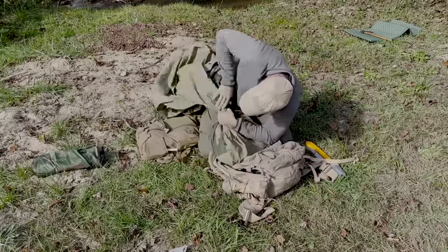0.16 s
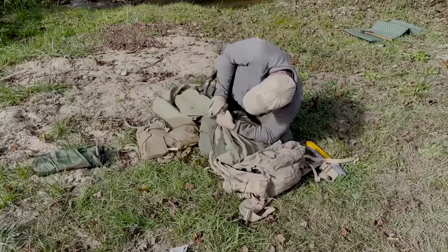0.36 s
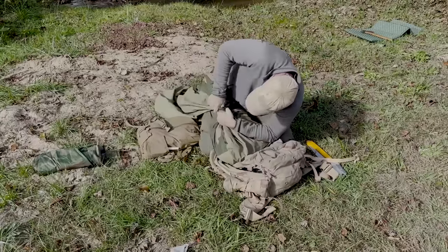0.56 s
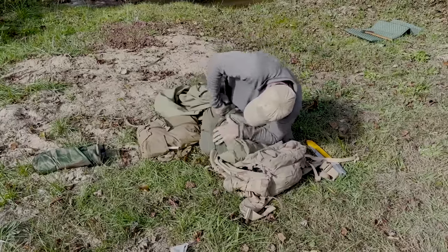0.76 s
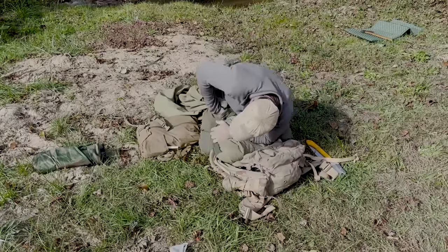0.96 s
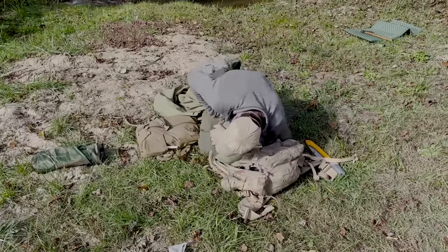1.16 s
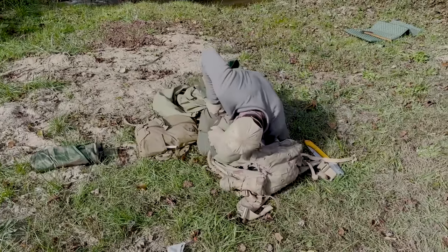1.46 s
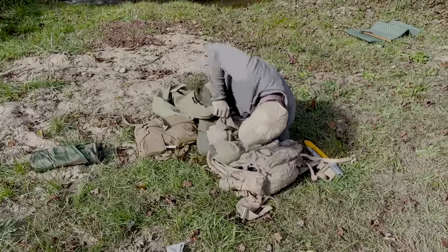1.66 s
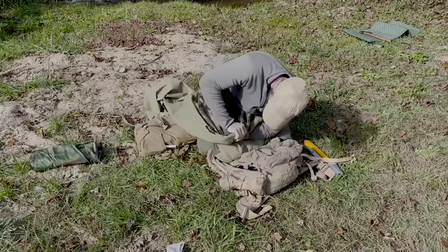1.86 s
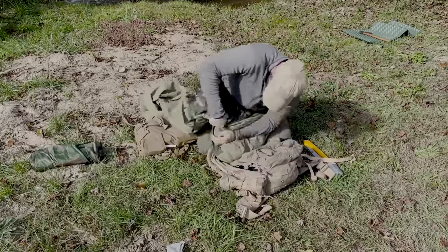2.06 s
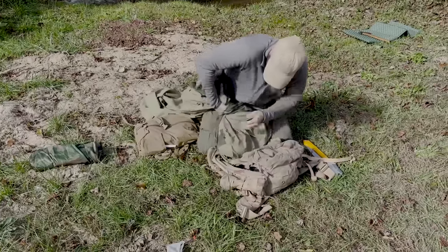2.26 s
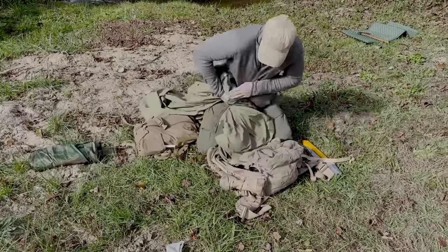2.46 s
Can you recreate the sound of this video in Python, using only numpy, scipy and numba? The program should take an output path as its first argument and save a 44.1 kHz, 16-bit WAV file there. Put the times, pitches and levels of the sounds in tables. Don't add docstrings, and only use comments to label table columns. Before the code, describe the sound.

Stiff coated fabric rustles as a stuffed bag is twisted shut on open ground, a few metres away. Swishes come at 0.1-0.3 seconds, brightest and sharpest near 0.6, with small crease ticks around 1.1-1.5, longer soft slides from 1.6 to 2.3, and a last rustle near 2.5. Low wind flutters buffet the microphone at 0.1-0.4 and 0.7-0.85, fading to faint puffs over distant outdoor hush.

```python
import sys
import numpy as np
from scipy import signal
from scipy.fft import rfft, irfft
from scipy.io import wavfile
from scipy.ndimage import uniform_filter1d
from numba import njit

SR = 44100
rng = np.random.default_rng(int(sys.argv[2]) if len(sys.argv) > 2 else 0)


def nominal_scale(level):
    x = np.asarray(level, float) / 20
    return 10 ** x


def transcribe(signal):
    frames = np.atleast_2d(signal).T
    limited = np.clip(frames, -1, 1)
    pcm = np.round(limited * 32767).astype(np.int16)
    wavfile.write(sys.argv[1], SR, pcm)


N = 114660


def unit(x):
    return x / np.sqrt(np.mean(x ** 2))


@njit
def svf(x, hz, damping, low):
    y, band, deep = np.empty(len(x)), 0., 0.
    for i in range(len(x)):
        g = np.tan(np.pi * hz[i] / SR)
        v = (band + g * (x[i] - deep)) / (1 + g * (g + damping))
        y[i] = low * (deep + g * v) + (1 - low) * damping * v
        band, deep = 2 * v - band, deep + 2 * g * v
    return y


def walk(rate_hz):
    hold = int(SR / rate_hz)
    steps = np.repeat(rng.standard_normal(N)[:N // hold + 1], hold)
    return 1.2 * uniform_filter1d(uniform_filter1d(steps, hold), hold)[:N]


def colour(x, table, tilt_db=0.):
    octave = np.log2(np.fft.rfftfreq(x.shape[-1], 1 / SR) + 1)
    hz, db = np.transpose(table)
    curve_db = np.interp(octave, np.log2(hz), db) + tilt_db * (octave - np.log2(3000))
    return irfft(rfft(x) * nominal_scale(curve_db), x.shape[-1])


def swell(count, rise):
    u, rise = np.arange(count) / count, np.clip(rise, .05, .9)
    return np.sin(np.pi / 2 * np.minimum(u / rise, (1 - u) / (1 - rise))) ** 2


def add(out, x, start_s):
    i = int(start_s * SR)
    out[..., i:i + x.shape[-1]] += x[..., :N - i]


def hush():
    # frequency in Hz, level in dB per Hz.
    hush_tone = [(70, -16), (200, -11.5), (670, -3.5), (810, 0.5), (980, -5), (2800, -7.5), (11000, -7.5),
                 (13500, -61)]
    base = rfft(unit(colour(rng.standard_normal((2, N)), hush_tone)))
    octaves = np.log2(np.fft.rfftfreq(N, 1 / SR) + 1)
    out, together = 0, walk(1.0)
    for octave in np.arange(4, 15):
        band = irfft(base * np.clip(1 - abs(octaves - octave), 0, 1), N)
        out = out + band * nominal_scale(.5 * together + .8 * walk(9.33))
    return out * nominal_scale(-54.5)


def rumble():
    # time in seconds, rumble level in dB.
    gust = [(0, -32), (0.092, -25), (0.105, -39.5), (.16, -22), (.21, -20), (.35, -23.5), (.4, -32),
            (.52, -38), (.64, -37.5), (0.699, -28.5), (0.728, -19.5), (0.821, -15.5), (.865, -34),
            (.9, -45), (1.03, -57.5), (1.5, -60), (1.7, -75), (2.6, -81)]
    times, levels = np.transpose(gust)
    flutter_db = 2.2 * walk(45)
    db = np.interp(np.arange(N) / SR, times, levels) + flutter_db
    top_hz = np.clip(230 * 2 ** ((db + 21) / 23.5), 40, 3000)
    gain = nominal_scale(db) * np.sqrt(SR / 2 / top_hz)

    def lead(x):
        return np.r_[x[2000:0:-1], x]

    out, top_hz = np.zeros((2, N)), lead(top_hz)
    for ch, noise in enumerate(rng.standard_normal((2, N))):
        push = svf(lead(noise * gain), top_hz, 1.48, 0.88)
        push = svf(push, top_hz, 1.46, 0.88)
        out[ch] = svf(push, 1.88 * top_hz, 1.41, 1.)[-N:]
    return out


def eddies():
    # start in seconds, length in seconds, level in dB, centre in Hz.
    eddy_rows = [(.046, 0.013, -30, 515), (.061, 0.024, -37.5, 580), (.106, 0.041, -38, 335),
                 (.135, 0.018, -31, 634), (.172, 0.014, -27, 646), (0.184, 0.03, -24.5, 683),
                 (.2, 0.027, -25.5, 680), (0.215, 0.051, -29, 344), (0.24, 0.023, -25, 227),
                 (.268, 0.041, -14.5, 238), (.29, 0.031, -24, 338), (.315, 0.054, -23.5, 251),
                 (.345, 0.048, -33.5, 240), (.365, 0.031, -35, 230), (0.437, 0.0051, -40.5, 740),
                 (.45, 0.08, -40, 120), (.53, 0.13, -40, 111), (0.652, 0.014, -33, 230),
                 (0.69, 0.036, -28.5, 239.6), (0.726, 0.029, -27, 278), (.772, 0.057, -26, 230),
                 (0.797, 0.018, -25.5, 242), (.81, 0.02, -24, 241), (.828, 0.016, -25, 192),
                 (.15, 0.042, -34, 614), (.273, 0.0055, -39, 890), (.712, 0.017, -30, 336),
                 (.68, .09, -31, 98), (1.345, 0.012, -58, 258)]
    # start in seconds, length in seconds, level in dB, centre in
    # Hz.
    more_eddies = [(.398, 0.048, -43.5, 330), (0.72, 0.016, -35, 274), (.465, 0.034, -45.5, 290),
                   (.533, 0.015, -50, 300), (.555, 0.015, -52, 490), (.59, 0.014, -52, 210), (.42, .1, -40, 123),
                   (.57, .08, -42, 85), (.99, .012, -58, 510), (0, .015, -63, 700), (1.53, 0.023, -64, 280),
                   (1.4, 0.033, -58, 190), (.194, 0.011, -28, 890), (0.014, 0.033, -47.5, 330),
                   (0.47, 0.024, -52, 800), (.798, .017, -28.5, 472), (.811, 0.017, -26.5, 474),
                   (.692, 0.027, -34, 410), (0.76, .07, -61.5, 66), (1.8, 0.051, -72, 66), (1.9, 0.081, -59, 66),
                   (.75, .02, -38, 370), (1.38, 0.051, -53, 73), (.63, .05, -40.5, 140)]
    # time in seconds, level in dB.
    puffs = [(0.916, -45.5), (0.952, -49), (0.985, -42), (1.062, -56.5), (1.108, -75), (1.202, -55.5),
             (1.254, -44), (1.291, -54), (1.343, -45.5), (1.389, -64), (1.44, -63), (1.474, -60),
             (1.529, -75), (1.632, -68), (1.94, -62), (2.33, -63), (2.45, -55), (2.475, -56.5),
             (2.561, -64)]
    soft = [(s - 0.0084, 0.032, db, 93.5) for s, db in puffs]
    bursts = list(eddy_rows) + soft + list(more_eddies)
    out = np.zeros((2, N))
    for (s, length_s, db, hz), seed in zip(bursts, rng.standard_normal((len(bursts), 2, 4096))):
        n = min(int(length_s * SR), 3000)
        push = seed * np.pad(swell(n, 0.14), (0, 4096 - n))
        sag_hz = hz * 0.83 ** np.minimum(np.arange(4096) / n - .4, 1.)
        burst = []
        for p in push:
            p = svf(p, sag_hz, 0.98, 0.)
            p = svf(p, 1.63 * sag_hz, 0.94, 0.85)
            burst.append(svf(p, 1.073 * sag_hz, 1.45, 1.0))
        burst = np.array(burst)
        rms = np.sqrt(np.sum(burst ** 2, axis=1, keepdims=True) / (n / 2))
        add(out, nominal_scale(db) * burst / rms, s)
    return out


def wind():
    likeness, lead_s, left_db = 0.89, 0.0001, 1.0
    mid, side = (rumble() + eddies()) * np.sqrt(np.array([[1 + likeness], [1 - likeness]]) / 2)
    t = np.arange(N) / SR
    right = np.interp(t + lead_s, t, mid - side)
    return np.array([(mid + side) * nominal_scale(left_db / 2), right * nominal_scale(-left_db / 2)])


def ticks():
    # start in seconds, level in dB, ring in Hz.
    snap_list = [(.105, -51, 6000), (0.946, -50, 1690), (1.103, -45, 9400), (1.110, -53, 8300),
                 (1.136, -48, 8000), (1.142, -52, 4200), (1.152, -54, 7700), (1.202, -54, 7300),
                 (1.28, -51, 7140), (1.313, -53, 7900), (1.325, -51, 8000), (1.47, -51, 8220),
                 (1.517, -51, 8500), (1.524, -50, 4700), (1.975, -48, 2350), (2.4, -50, 3020),
                 (1.08, -53, 4600), (.9, -53, 6000), (.907, -53, 7000)]
    out, n = np.zeros((2, N)), int(.005 * SR)
    for (s, db, hz), seed in zip(snap_list, rng.standard_normal((len(snap_list), 512))):
        ring = svf(seed[:n], np.full(n, 1. * hz), .3, 0.)
        add(out[0], nominal_scale(db) * unit(ring) * swell(n, 0.12), s)
    return out


def fabric():
    # start in seconds, length in seconds, level in dB, brightness in dB per octave.
    strokes = [(0.049, 0.11, -50, -2), (0.096, 0.2, -48, -1.9), (0.34, 0.046, -57.5, 1),
               (0.5697, 0.074, -43.5, 4.5), (0.67, 0.063, -49.5, 3), (0.546, 0.16, -56, 3),
               (0.745, 0.051, -52.5, -2.5), (0.73, 0.16, -55, -3.5), (0.87, 0.19, -56, -2.3),
               (2.147, 0.23, -58, -4), (1.467, 0.2, -58, 0), (1.575, 0.42, -55.5, 0), (1.9, 0.31, -49.5, 1),
               (.125, 0.11, -60, 4), (0.66, 0.045, -58, 3), (1.7, 0.083, -57, 3), (0.233, 0.13, -56.5, -2),
               (1.99, 0.096, -59, 0.5), (2.09, .17, -54.5, 0.7), (0.24, 0.46, -57.5, -2),
               (.62, 0.43, -60, 3.5), (1.255, 0.34, -65, -1), (2.32, 0.5, -63, -0.5),
               (1.59, 0.28, -70, 0.5), (2.042, 0.3, -53.5, 2.4), (1.806, 0.4, -65.5, -1.5),
               (1.5, 0.13, -78, -5), (1.577, 0.2, -61.5, -0.1), (1.957, 0.19, -63.5, -4.5),
               (2.3, 0.19, -59, -2.5), (2.431, 0.098, -52, -0.5), (2.514, 0.13, -53, -3)]
    # frequency in Hz, level in dB per Hz.
    cloth_tone = [(150, -5), (400, -2.5), (800, -4.5), (2000, -5), (6000, -6), (9000, -5), (11300, -1),
                  (15500, -14.5)]
    creases_per_s, crease_db, crease_share = 9300, 4, 0.57
    out, chance = np.zeros((2, N)), rng.random((2, N))
    size = (chance[0] < creases_per_s / SR) * nominal_scale(-crease_db * np.log(chance[1] + 0.0045))
    creases = unit(signal.lfilter([1], [1, -.9], size) * rng.standard_normal((2, N)))
    hiss = rng.standard_normal((2, N))
    rub = (crease_share * creases + hiss) * nominal_scale(0.78 * walk(40.34))
    for s, length_s, db, tilt_db in strokes:
        i = int(s * SR)
        n = min(int(length_s * SR), N - i)
        swish = unit(colour(rub[:, i:i + n], cloth_tone, tilt_db))
        add(out, nominal_scale(db) * swish * swell(n, 0.41), s)
    return out


def ports(common, apart):
    # frequency in Hz, left minus right in dB, right's lead in turns, likeness from 0 to 1.
    spacing = [(60, .3, .001, .7), (350, 1.6, -.02, .94), (750, 5.4, -.03, .8), (1500, 4.1, .001, .45),
               (2000, 2.6, .04, .55), (2900, 4.1, -.12, .8), (5200, 4.6, -.13, .8), (6500, 2.6, -.02, .8),
               (7700, 1.2, -.13, .82), (8350, .01, -.015, .99), (8750, .01, .015, .997),
               (10250, .01, .5, .998), (11750, .01, .96, .9998), (12200, .01, 1.04, .9998),
               (12950, .01, 1.33, .9998), (13300, .01, 1.495, .9998), (14250, .01, 1.505, .9998),
               (14850, .01, 1.97, .9998), (15300, .01, 2, .9998)]
    f, tab = np.fft.rfftfreq(N, 1 / SR), np.array(spacing)
    db, turns, like = (np.interp(f, tab[:, 0], tab[:, k]) for k in (1, 2, 3))
    a = rfft(common) * np.sqrt((1 + like) / 2)
    b = rfft(apart) * np.sqrt((1 - like) / 2)
    left = (a + b) * nominal_scale(db / 2)
    right = (a - b) * nominal_scale(-db / 2) * np.exp(2j * np.pi * turns)
    return irfft(np.array([left, right]), N)


def gate(x):
    offset, bins = 80, 8
    window = signal.windows.kaiser_bessel_derived(2048, 4 * np.pi)
    frame = dict(window=window, nperseg=2048, noverlap=1024, fs=SR)
    mid_side = np.array([x[0] + x[1], x[0] - x[1]]) / 2
    f, _, z = signal.stft(np.pad(mid_side, ((0, 0), (offset, 0))), **frame)
    power = (abs(z[:, :-1]) ** 2).reshape(2, -1, bins, z.shape[-1]).mean(axis=2)
    frame_db = 10 * np.log10(np.sum(abs(z[0]) ** 2, axis=0) + 1e-12)
    side_db = 3.5 * np.outer([0, 1], f[:-1] > 12000)[..., None]
    floor_db = -102.5 - .1 * (frame_db + 62) + side_db
    loud_enough = np.repeat(power, bins, axis=1) > nominal_scale(2 * floor_db)
    z[:, :-1] *= loud_enough | (f[:-1, None] < 7000)
    mid, side = signal.istft(z, **frame)[1][:, offset:offset + N]
    return np.array([mid + side, mid - side])


def scene():
    air = hush() + ticks() + fabric()
    return wind() + ports(air[0], air[1])


def top_cut(x):
    return signal.sosfilt(signal.butter(12, 17070, fs=SR, output="sos"), x)


def record(dry):
    # frequency in Hz, level in dB.
    mic_body = [(1280, 0.92), (1420, -4.5), (1750, -0.6), (2080, -3.5), (2500, -2), (3500, -4), (3850, -7),
                (4400, -5.5)]
    # frequency in Hz, level in dB.
    mic_treble = [(11800, .1), (12800, -9), (14000, -13), (15650, -10.5), (15800, -50)]
    low_cut = signal.butter(4, 48.8, "high", fs=SR, output="sos")
    x = signal.sosfilt(low_cut, colour(colour(dry, mic_body), mic_treble))
    ceiling = 0.37
    mix = gate(ceiling * np.tanh(x / ceiling))
    return top_cut(mix)


dry = scene()
out = record(dry)
transcribe(out)
```